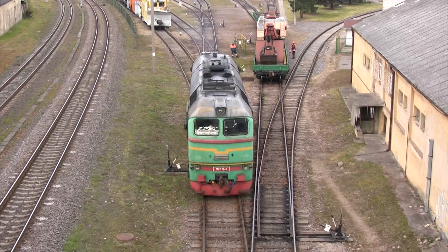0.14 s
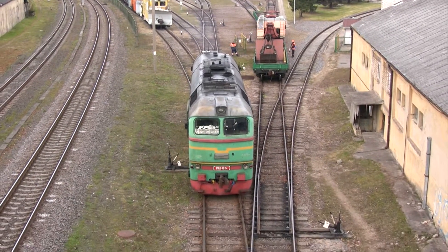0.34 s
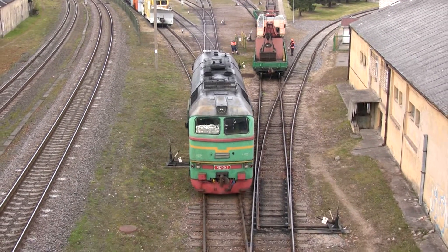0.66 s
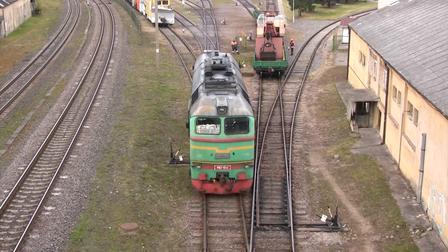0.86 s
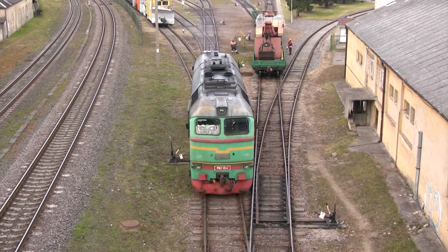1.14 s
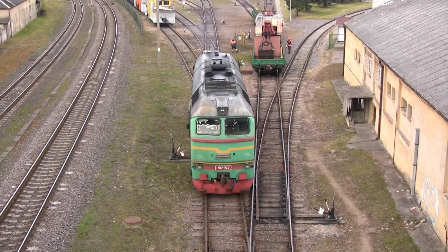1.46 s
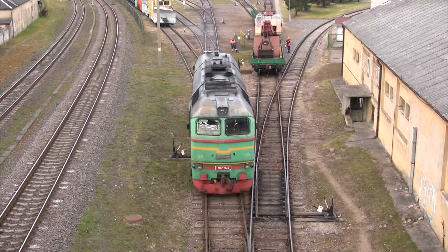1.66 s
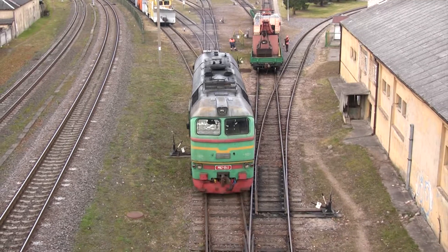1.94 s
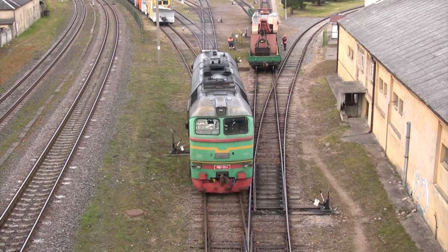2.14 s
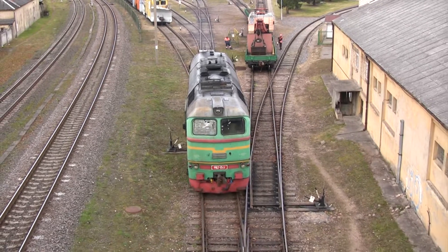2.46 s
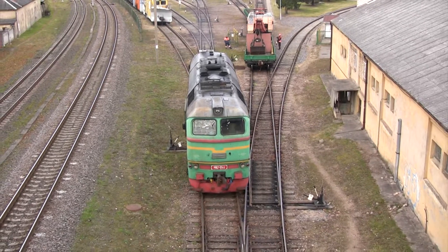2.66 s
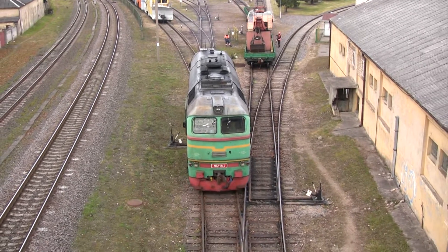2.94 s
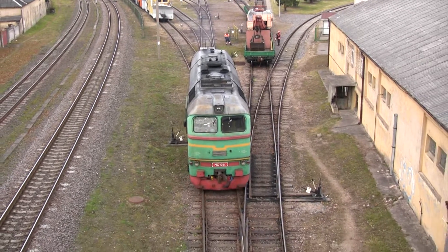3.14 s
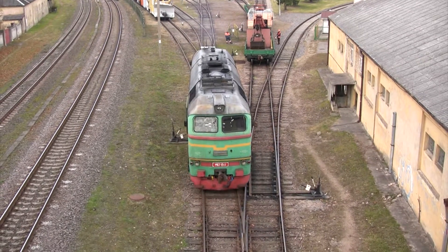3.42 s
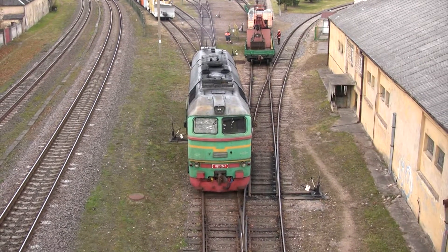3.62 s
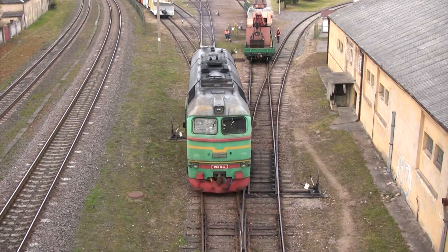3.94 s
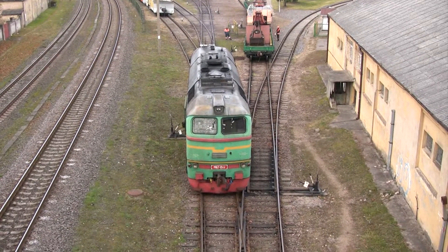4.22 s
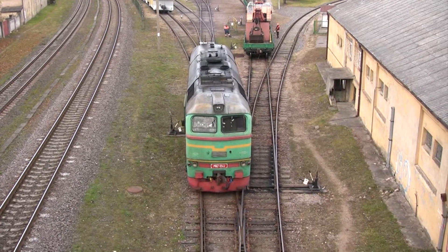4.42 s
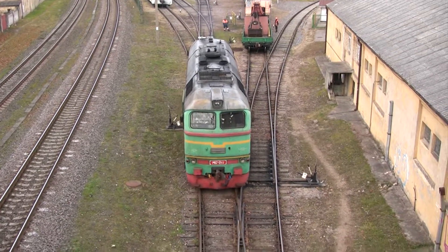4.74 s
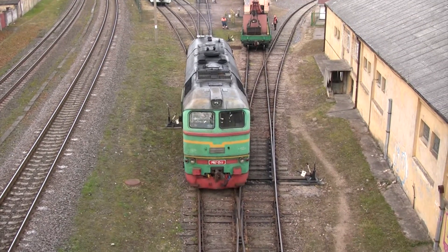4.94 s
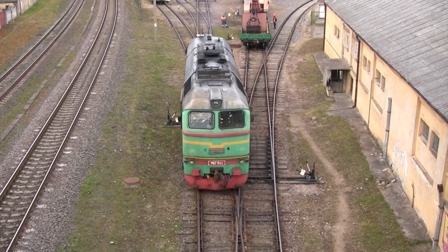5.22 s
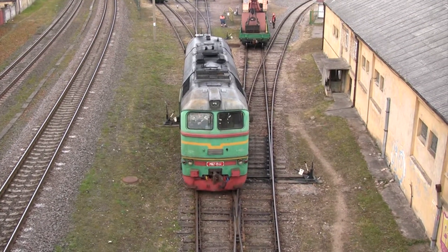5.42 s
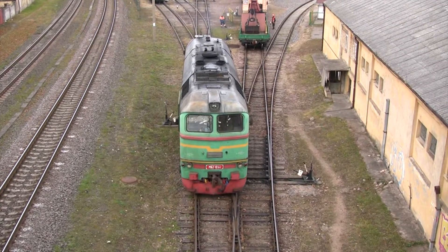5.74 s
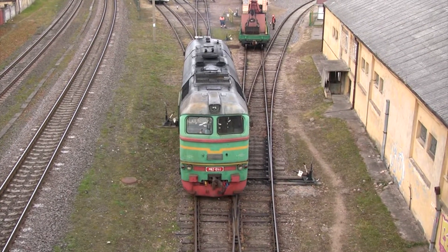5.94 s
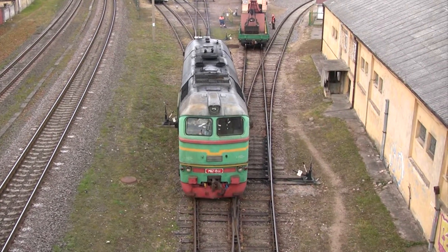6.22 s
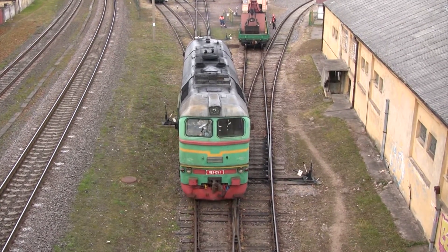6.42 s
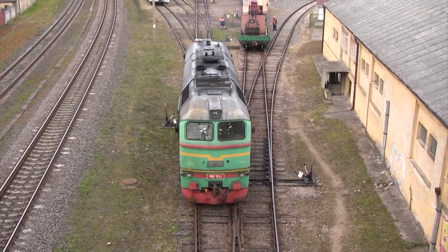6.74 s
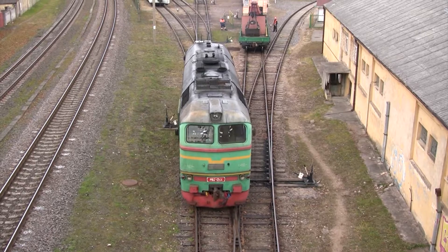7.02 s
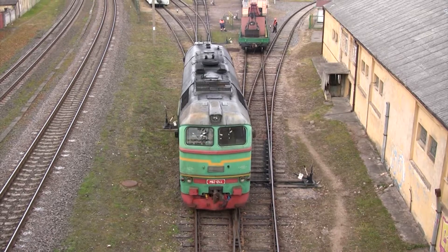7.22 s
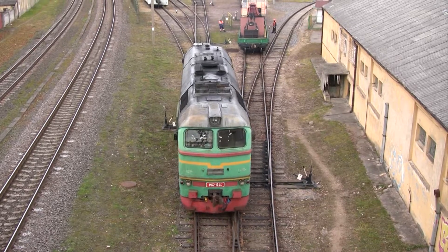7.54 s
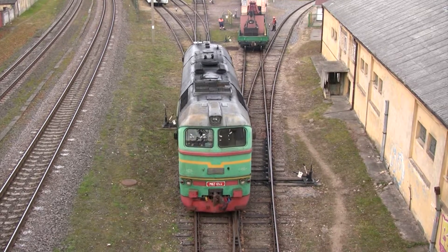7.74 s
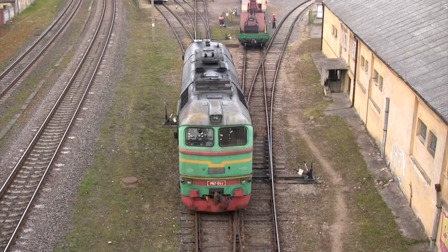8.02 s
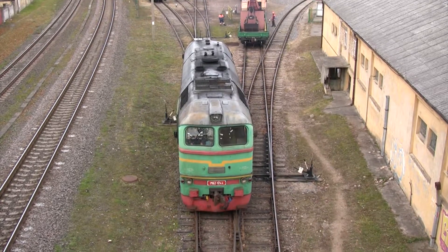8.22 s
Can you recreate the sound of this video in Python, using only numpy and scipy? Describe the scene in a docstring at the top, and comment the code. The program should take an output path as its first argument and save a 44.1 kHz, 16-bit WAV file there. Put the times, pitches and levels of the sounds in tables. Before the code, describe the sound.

A large diesel locomotive creeps at idle through an open rail yard towards a stereo microphone above the tracks. Throughout, deep clean exhaust tones beat with one strong throb about seven times a second, almost perfectly regular, over a low steady roar of fans and gas. From 0 to 0.8 s short puffs of air hiss over a broad, uneven rush; the rush surges until about 1.5 s, then thins by 3 s. Faint rough gear whine lingers underneath. Thin, rapid metallic chatter with a little hiss flickers in the treble from about 1 to 3.6 s, swells again around 4.7 and 5.3 s, returns near 7 s and lightly at 8.3 s. The engine drone becomes a little fuller and closer as the locomotive advances, and an extra low hum rises around 8 s. The engine is still running when the sound ends at about 8.4 s.

```python
"""We hear a comb of clean low exhaust tones, repeating every crank turn with one strong throb, under a roar.
A twelve-cylinder two-stroke diesel locomotive creeps at idle towards a footbridge over a rail yard.
Summed sines make the exhaust and low hum swells early and late; coloured noise makes the roar of fans
and gas, a broad rush that dies away in the first seconds, and air hiss. Noise through narrow resonances
makes the faint gear whine and the thin chatter of some metal part in the treble."""
import sys
import numpy as np
from scipy import signal
from scipy.fft import rfft, irfft, next_fast_len
from scipy.io import wavfile
from scipy.ndimage import uniform_filter1d

SR = 44100
rng = np.random.default_rng(int(sys.argv[2]) if len(sys.argv) > 2 else 0)


def put_to_file(sound):
    """Save the sound as 16-bit audio at rate SR, in the file named by the first command-line argument."""
    columns = np.atleast_2d(sound).T  # one column per channel
    safe = np.clip(columns, -1, 1)
    whole_steps = np.round(safe * 32767)
    wavfile.write(sys.argv[1], SR, whole_steps.astype(np.int16))


N = 369116


def undb(db):
    """Turn decibels into an amplitude factor."""
    return 10 ** (np.asarray(db) / 20)


def curves(table):
    """Draw the columns of a timed table as sample-rate curves."""
    s, *columns = np.transpose(table)
    return [np.interp(np.arange(N) / SR, s, column) for column in columns]


def on_log(table, hz):
    """Read a frequency table along a logarithmic pitch axis."""
    table_hz, values = np.array(table)[:, 0], np.array(table)[:, 1]
    return np.interp(np.log(hz), np.log(table_hz), values)


def unit(x):
    """Scale to an rms of 1."""
    return x / np.sqrt(np.mean(x ** 2))


def walk(rate, size=N, sr=SR):
    """Random levels held 1 / rate s and slewed twice; spread near 1."""
    hold = int(sr / rate)
    steps = np.repeat(rng.standard_normal(size // hold + 1), hold)
    return 1.3 * uniform_filter1d(uniform_filter1d(steps, hold), hold)[:size]


def swell(peak_s, rise_s, fall_s):
    """Gain that climbs and drops at steady dB rates round its peak; rise and fall in s per 10 dB."""
    late = np.arange(N) / SR - peak_s
    return undb(-10 * np.maximum(-late / max(rise_s, .005), late / max(fall_s, .005)))


def swells_gain(swells):
    """Sum of several swells, each at its own peak level."""
    return sum(undb(db) * swell(*shape) for *shape, db in swells)


def ring(x, hz, width, drift_hz=0.):
    """A resonance applied twice, its pitch free to drift; rms 1."""
    pole = np.exp((2j * np.pi * hz - 1.5 * np.pi * width) / SR)
    drift = np.exp(2j * np.pi * np.cumsum(drift_hz) / SR)
    return unit((signal.lfilter([1], np.poly([pole, pole]), x) * drift).real)


# likeness of the two microphone ports for spread-out sound: f/Hz, correlation
PORT_LIKENESS = [(60, .998), (300, .97), (600, .92), (1400, .87), (2600, .82), (4200, .68), (7000, .8),
                 (12000, .8)]
# unrest of each noise: (common swell dB, flicker of each octave dB)
STEADY, SURGING, GUSTY = (.25, .8), (.6, 1.6), (.3, 1.3)


def air(spectrum, unrest):
    """Two-port noise of a given colour, rms 1; octaves swell together and flicker alone."""
    size = next_fast_len(N)
    hz = np.maximum(np.arange(size // 2 + 1) * SR / size, 1)
    same = np.clip(on_log(PORT_LIKENESS, hz), 0, 1)
    left, other = rfft(rng.standard_normal((2, size))) * undb(on_log(spectrum, hz))
    right = same * left + np.sqrt(1 - same ** 2) * other
    inside = (hz > spectrum[0][0]) & (hz < spectrum[-1][0])
    pair = np.array([left, right]) * inside
    swell_db, flicker_db = unrest
    step = 32  # samples per gain value
    count = N // step + 1
    out, common = 0, walk(1.97, count, SR / step)
    for octave in range(5, 15):  # centred on 2 ** octave Hz, crossfading into its neighbours
        share = np.cos(np.pi / 2 * np.clip(np.log2(hz) - octave, -1, 1)) ** 2
        if share @ inside > 0:
            gain = undb(swell_db * common + flicker_db * walk(9, count, SR / step))
            out = out + irfft(pair * share, size)[:, :N] * np.repeat(gain, step)[:N]
    return unit(out)


# low tones: f/Hz at the start, glide/(Hz per s), start/turns
HUM_TONES = [(129.85, 0, 0), (65.4, 0, .5), (70.35, -.74, .13), (139.6, 0, .25)]
# one list of swells per low tone: peak t/s, rise and fall/(s per 10 dB), level/dB
HUM_SWELLS = ([(8.05, 0.68, 0.33, -19)], [(8.25, 0.96, .2, -21.5)], [(.45, .35, 1.1, -25.5),
              (1.4, 0.81, 0.62, -28.5)], [(.62, 0.21, .3, -28), (1.35, .3, .4, -35)])


def hum():
    """Clean low sines, not tied to the crank, perhaps from a second engine."""
    t = np.arange(N) / SR
    out = 0
    for swells, (hz, glide, start) in zip(HUM_SWELLS, HUM_TONES):
        turns = hz * t + glide * t ** 2 / 2 + start
        out = out + swells_gain(swells) * np.sin(2 * np.pi * turns)
    return np.sqrt(2) * out


# colour of the rush: f/Hz, relative level/(dB per Hz)
RUSH_COLOUR = [(150, -30.5), (280, 2), (500, -1), (900, -4), (1500, -12), (2100, -15), (3000, -33),
               (5000, -65.5)]
# fader moves on the rush: t/s, level/dB, gain round 950 Hz/dB, gain above 1.2 kHz/dB
RUSH_FADERS = [(0, -21, -3, 6.5), (.1, -22.5, -1, 6.5), (.28, -27, -1, 11.5), (.37, -25, 2, 4.5),
               (.5, -23.5, 1.5, 0.5), (.56, -20.5, 3.5, 0), (.74, -23.5, 4.5, 2.5), (.8, -22, 1, -0.5),
               (1, -22.5, -1, 1), (1.05, -21, 4, -6), (1.24, -20.5, 1.5, -15), (1.32, -20.5, 1.5, -20),
               (1.5, -22.5, 1.5, -12), (1.62, -23, -1, -12), (2, -25, 0, -1), (3, -30, 0.5, 4.5),
               (4.5, -28.5, -1.5, 1), (8.37, -30, -0.5, -5)]


def rush():
    """A broad noise rush that thins out; it surges in its middle, and its upper part comes and goes."""
    level_db, middle_db, bright_db = curves(RUSH_FADERS)
    noise = air(RUSH_COLOUR, GUSTY)
    middle = signal.sosfilt(signal.butter(1, [750, 1200], "band", fs=SR, output="sos"), noise)
    upper = signal.sosfilt(signal.butter(1, 1200, "high", fs=SR, output="sos"), noise)
    shaped = noise + middle * (undb(middle_db) - 1) + upper * (undb(bright_db) - 1)
    return shaped * undb(level_db)


# bouts of chatter, the hiss swelling with them:
# peak t/s, rise and fall/(s per 10 dB), high ring level/dB, low ring level/dB, hiss level/dB
CHATTER_BOUTS = [(.99, .02, .03, -56, -57, -55), (1.15, 0.1, 0.13, -44.5, -46.5, -44),
                 (1.25, .06, .03, -55, -43, -55), (1.45, 0.19, 0.24, -46.5, -47.5, -41),
                 (1.62, 0.068, .04, -56, -50, -42), (1.73, 0.043, .03, -65, -47, -43),
                 (1.85, 0.043, 0.18, -62, -58, -43), (2.15, 0.37, 0.045, -52, -57, -52),
                 (2.46, 0.077, 0.054, -51, -51, -44.5), (2.68, 0.066, 0.54, -57, -54.5, -47),
                 (2.91, .02, .03, -50, -54, -47), (3, 0.052, 0.035, -47.5, -49.5, -44),
                 (3.2, 0.07, 0.22, -45.5, -50, -44), (3.28, 0.096, 0.2, -47, -56, -50),
                 (3.59, .04, 0.24, -56, -56, -58), (4.65, 0.39, 0.89, -48, -53, -43),
                 (5.3, 0.089, 0.14, -43.5, -51, -48), (6.93, 0.37, 0.18, -51.5, -53, -43),
                 (6.96, .02, .02, -60, -46, -60), (7.04, 0.04, .04, -59, -48, -46),
                 (7.12, 0.078, 0.25, -45.5, -53, -51), (7.21, .02, .025, -57, -45, -52),
                 (8.28, 0.16, 0.39, -50, -56, -50)]


def bouts():
    """Gains of high ring, low ring and hiss, the bouts adding in power."""
    power = 0
    for peak_s, rise, fall, *dbs in CHATTER_BOUTS:
        power = power + (swell(peak_s, rise, fall) * undb(dbs)[:, None]) ** 2
    return np.sqrt(power)


HISS_DB = -50  # steady leak
PUFF_EDGE_S, PUFF_TOP_HZ = 0.0089, 6940  # time to rise or fall by 10 dB; low-pass corner
# colour of the hiss: f/Hz, relative level/(dB per Hz)
HISS_COLOUR = [(2000, -22), (3500, -4), (5000, -2.5), (7500, -4), (9500, -2), (11000, -12), (13000, -48)]
# puffs of let-off air: start t/s, length/s, level before dulling/dB
AIR_PUFFS = [(0.01, 0.16, -35.5), (0.17, 0.14, -37.5), (0.536, 0.23, -43.5)]


def hiss(rubbing):
    """Noise for a steady leak, duller puffs of air and the hiss that goes with the chatter."""
    t = np.arange(N) / SR
    puffs = 0
    for start, length, db in AIR_PUFFS:
        outside_s = np.maximum(0, np.maximum(start - t, t - start - length))
        puffs = puffs + undb(db - 10 * outside_s / PUFF_EDGE_S)
    noise = air(HISS_COLOUR, SURGING)
    low_pass = signal.butter(1, PUFF_TOP_HZ, fs=SR, output="sos")
    dull = signal.sosfilt(low_pass, noise[:, ::-1])  # played backwards so it differs from the leak
    return noise * np.hypot(undb(HISS_DB), rubbing) + dull * puffs


WHINE_FLUTTER_DB = 1.2
# rough whines of the running gear: f/Hz, width/Hz, waver/Hz, glide/(Hz per s)
GEAR_WHINES = [(287, 10, .5, 0), (484, 4, 2, -.4), (1545, 60, 20, 0)]
# one list of swells per whine: peak t/s, rise and fall/(s per 10 dB), level/dB
GEAR_SWELLS = ([(1.1, 2.5, 1.7, -34)], [(.05, .3, .3, -35), (.7, .5, .6, -37.5), (1.75, .8, .2, -34.5),
               (7.93, .06, .6, -36), (8.18, .6, .15, -34.5)], [(2.5, 0.37, 2.2, -45),
               (4.5, .6, 0.35, -42.5), (5.3, 0.22, .2, -45), (6, 0.44, 0.6, -43), (7.2, 0.46, 0.97, -45.5)])


def whines():
    """Running gear: noise in narrow resonances that waver, glide and flutter."""
    t = np.arange(N) / SR
    out = 0
    for (hz, width, waver_hz, glide), swells in zip(GEAR_WHINES, GEAR_SWELLS):
        tone = ring(rng.standard_normal(N), hz, width, waver_hz * walk(4) + glide * t)
        out = out + tone * undb(WHINE_FLUTTER_DB * walk(15)) * swells_gain(swells)
    return out


STROKE_HZ, STROKE_TICK = 52.17, 7.  # mean stroke rate; opening tick against the scrape
LOW_RING_RISE_HZ_PER_S, LOW_RING_FLICKER_DB = 12, 1.
LOW_RING_LEFT_DB = 6  # left port over right
# metal modes, the first the low ring, the rest the high ring: f/Hz, width/Hz, relative level/dB
METAL_MODES = [(4410, 125, 0), (5820, 150, -10), (6160, 100, -11), (7410, 180, -6), (9140, 150, 4),
               (9750, 120, -7), (10900, 110, -11), (12800, 110, -25), (13800, 70, -20)]


def chatter(high_gain, low_gain):
    """Rapid strokes, each a tick and a short scrape, ring narrow metal modes."""
    phase = np.cumsum(STROKE_HZ * (1 + 0.017 * walk(12))) / SR
    stroke = phase.astype(int)
    # each stroke lands at its own random level, separately for low and high ring
    chance_db = 2. * rng.standard_normal((stroke[-1] + 1, 2))[stroke].T
    scrape = np.exp(-(phase % 1) / .35) * rng.standard_normal((2, N))
    tick = STROKE_TICK * np.diff(stroke, prepend=0)
    low_strokes, high_strokes = (scrape + tick) * undb(chance_db)
    (low_hz, low_width, low_db), *high_modes = METAL_MODES
    low = ring(low_strokes, low_hz, low_width, LOW_RING_RISE_HZ_PER_S * np.arange(N) / SR)
    low = low * undb(low_db + LOW_RING_FLICKER_DB * walk(14))
    high = sum(ring(high_strokes, hz, width) * undb(db) for hz, width, db in high_modes)
    pan = undb(LOW_RING_LEFT_DB * np.array([[.5], [-.5]]))
    return low * low_gain * pan + high * high_gain


# colour of the engine roar: f/Hz, relative level/(dB per Hz)
ROAR_COLOUR = [(20, -47), (35, -41), (60, -19), (85, -24), (110, -23), (140, -18.5), (165, -16.5),
               (230, -18.5), (345, -23.5), (420, -20), (700, -29), (1200, -31.5), (1540, -31), (1750, -35),
               (2600, -40.5), (9000, -60.5), (11500, -58), (13000, -110)]
# roar fader before the firing pulse: t/s, level/dB
ROAR_FADER = [(0, -26), (3, -25), (4.5, -27), (6, -28), (7.5, -26), (8.37, -27.5)]


def roar(pulsing):
    """Noise of gas, blower and fans; it pulses a little with the firings."""
    return air(ROAR_COLOUR, STEADY) * undb(curves(ROAR_FADER)[0]) * pulsing


CRANK_HZ = 6.8393  # steady idle, before hunting
# the governor hunts round the idle speed: t/s, lead over a steady crank/turns
GOVERNOR_HUNT = [(0, .006), (.6, .0062), (1.2, .0125), (1.8, .0135), (2.4, .0073), (3.9, -.002),
                 (4.5, .002), (5.1, .0115), (5.5, .0132), (6.3, .0037), (6.8, .0037), (7.3, .0065),
                 (8.37, -.002)]


def crank():
    """Turns of the crank so far, steady rotation plus the smoothed hunting of the governor."""
    return CRANK_HZ * np.arange(N) / SR + uniform_filter1d(curves(GOVERNOR_HUNT)[0], SR // 4)


FIRING_SCATTER_DB = .8
# gas puff of each of the twelve cylinders, in firing order: mean level/dB
CYLINDER_PUFFS = [-0.24, -0.57, -0.19, 0.049, 0.3, 0.48, 0.56, 0.31, 1.3, 1.1, 0.34, -0.74]


def throb(turns):
    """Gas level round the turn: each cylinder puffs at its own strength, a little different every time."""
    firing = turns * len(CYLINDER_PUFFS)
    count = np.arange(int(firing[-1]) + 2)
    db = np.array(CYLINDER_PUFFS)[count % len(CYLINDER_PUFFS)]
    db = db + FIRING_SCATTER_DB * rng.standard_normal(len(count))
    return undb(np.interp(firing, count, db))


START_TURN, SPREAD, SKEW = .747, .057, .0591  # throb position in turns; quadratic and cubic stagger
UPPER_ORDER, UPPER_TURNS = 33, (.86, -.036, -.009)  # upper tones' own puff: offset, slope, bend
BOOM_TOP_ORDER = 16  # tones below this are boom, the rest drone
UNEVEN = (.9, .1)  # slow random drift of each tone's level and phase: dB, radians
# exhaust tones before the approach gains: multiple of crank rate, rms level far, midway, near/dB
EXHAUST_TONES = [(6, -45, -43, -40), (8, -37, -35, -33), (9, -31, -26, -24), (10, -36, -35, -35),
                 (12, -33, -30, -44), (13, -46, -43, -50), (14, -31, -26, -33), (15, -30, -29, -38),
                 (16, -40, -42, -41), (17, -44, -35, -36), (18, -48, -47, -46), (19, -41, -42, -43),
                 (20, -44, -48, -43), (21, -43, -42, -39), (22, -30, -25, -25), (23, -22, -18, -18),
                 (24, -33, -30, -34), (25, -26, -24, -29), (26, -27, -24, -27), (27, -30, -29, -30),
                 (28, -32, -30, -32), (29, -34, -29, -36), (31, -42, -40, -44), (32, -42, -43, -45),
                 (33, -42, -42, -36), (34, -54, -48, -42), (35, -45, -37, -35), (36, -48, -47, -45),
                 (37, -42, -38, -45), (38, -44, -46, -47), (39, -50, -48, -47), (40, -50, -50, -43),
                 (41, -44, -43, -36), (42, -40, -44, -30), (43, -50, -50, -46), (59, -46, -39, -41)]
# approach: t/s, nearness (0 far, 1 midway, 2 and over near), drone gain/dB, boom gain/dB
APPROACH_MOVES = [(0, 0, -4, -1), (.5, 0.066, -2, 0.43), (1.5, 0, 1.5, 0.49), (2.2, 1.2, -1, 0.76),
                  (3.5, 0.47, 1.5, 0.28), (4.3, 1.17, 0.5, -0.1), (4.8, 1.63, 0.5, 0.076),
                  (6.5, 1.94, 0.5, 0.17), (8.2, 2.4, -.5, 0), (8.37, 1.5, -2, -0.18)]


def exhaust(turns):
    """Sines on the crank; staggered timing spreads puffs round the turn with one strongest throb."""
    step = 40  # samples per point; the sum is upsampled at the end
    near, drone_db, boom_db = (curve[::step] for curve in curves(APPROACH_MOVES))
    turn, out = turns[::step], 0
    for order, *dbs in EXHAUST_TONES:
        uneven_db, wobble = (spread * walk(3.006, len(turn), SR / step) for spread in UNEVEN)
        if order >= UPPER_ORDER:
            offset_turns = np.polyval(UPPER_TURNS[::-1], order - UPPER_ORDER)
            phase = 2 * np.pi * (order * turn + offset_turns) + wobble
        else:
            above = order - 23  # distance from the order that is not staggered
            stagger = np.pi * above ** 2 * (SPREAD + SKEW * above)
            phase = 2 * np.pi * order * (turn - START_TURN) - stagger + wobble
        db = np.interp(near, range(len(dbs)), dbs)
        db = db + (boom_db if order < BOOM_TOP_ORDER else drone_db)
        out = out + undb(db + uneven_db) * np.cos(phase)
    return np.sqrt(2) * signal.resample_poly(out, step, 1)[:N]


def scene():
    """Mix all layers; the firings pulse the roar, the rush and the hiss."""
    turns = crank()
    high, low, rubbing = bouts()
    pulsing = throb(turns)
    background = hum() + (rush() + hiss(rubbing)) * pulsing
    return background + whines() + chatter(high, low) + roar(pulsing) + exhaust(turns)


TOP_HZ = 14970  # low-pass edge
# left port over right port: f/Hz, level/dB
PORT_BALANCE = [(60, 1.5), (110, 1), (200, 2.5), (370, 1), (680, 0.5), (1260, 2), (2310, 0), (4250, 3),
                (7820, 2), (14400, 1)]
# lead of the left port: f/Hz, phase/radians
PORT_LEAD = [(300, 0.056), (3500, 0.4), (6500, 1.21), (9000, 2.06), (14000, 3.96)]


def record(dry):
    """The left port is nearer and a little more sensitive; the polarity is turned over; the top is cut."""
    size = next_fast_len(N + 64)
    hz = np.maximum(np.arange(size // 2 + 1) * SR / size, 1)
    tilt = undb(on_log(PORT_BALANCE, hz) / 2)
    response = [tilt, np.exp(-1j * on_log(PORT_LEAD, hz)) / tilt]
    ports = -irfft(rfft(dry, size) * response, size)[:, :N]
    return signal.sosfilt(signal.ellip(8, .2, 70, TOP_HZ, fs=SR, output="sos"), ports)


dry = scene()
out = record(dry)
put_to_file(out)
```